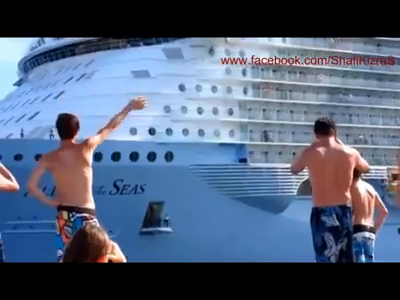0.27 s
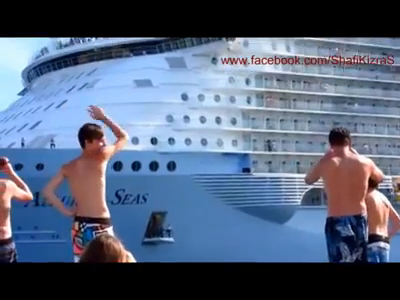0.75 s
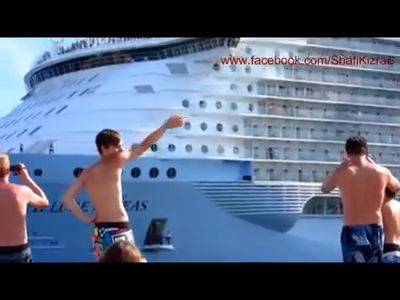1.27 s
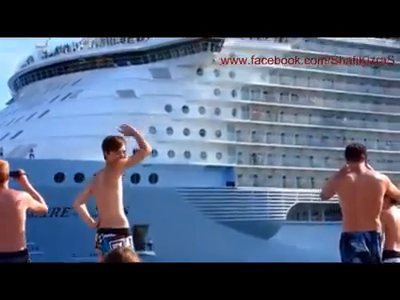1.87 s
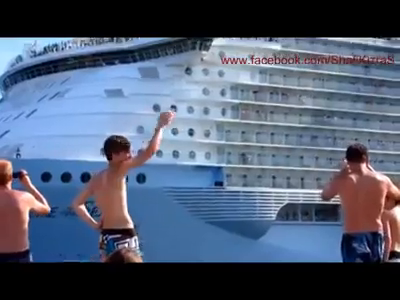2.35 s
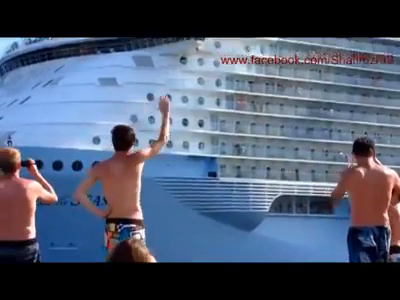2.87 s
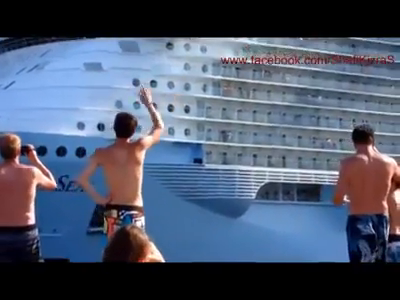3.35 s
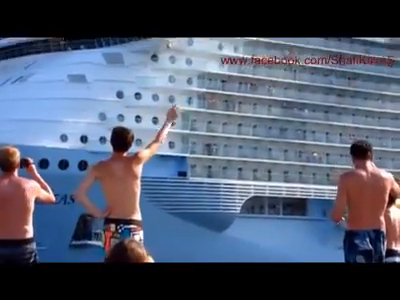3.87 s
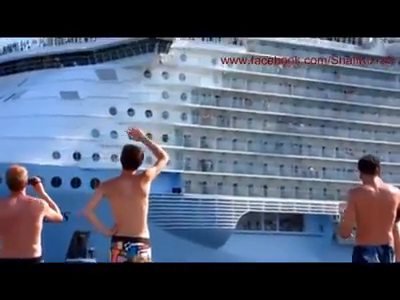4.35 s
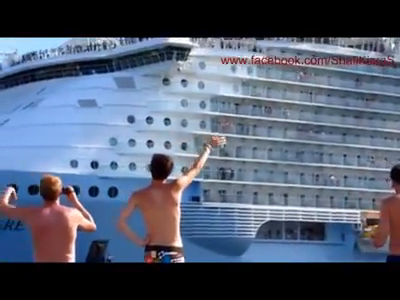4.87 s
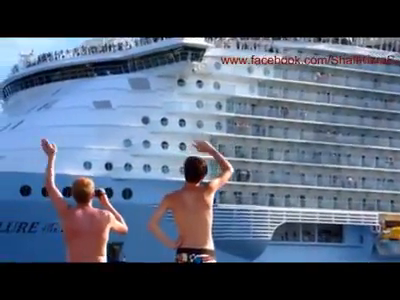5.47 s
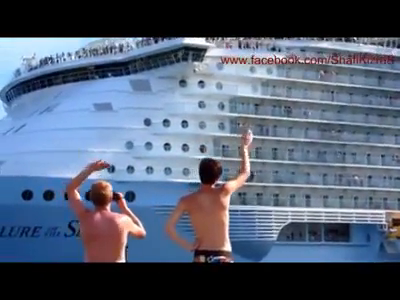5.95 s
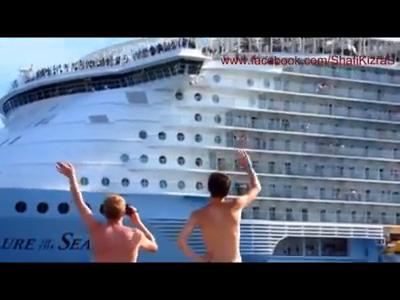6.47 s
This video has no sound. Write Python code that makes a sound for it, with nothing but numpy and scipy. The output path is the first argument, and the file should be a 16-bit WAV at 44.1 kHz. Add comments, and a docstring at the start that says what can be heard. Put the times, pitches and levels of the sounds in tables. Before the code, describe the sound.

Massive ship horn blast across the water, low, brassy and rasping with a rough beat, following a split second of beach surf and wind.

```python
"""Surf and wind wash over a beach, then cut off as a cruise ship's long blast arrives across the water.
Two air horns speak in a rush of air: sharp pressure pulses ring one bell, and a deeper horn beats against it.
Within the first second or so the tone stumbles three times, each time with a dry tick close by.
Moving air makes the partials swell, rasp and dull, over three faint wisps of filtered noise.
At the very end the air supply drops and the tone sinks quickly."""
import sys
import numpy as np
from scipy import signal
from scipy.io import wavfile
from scipy.ndimage import uniform_filter1d

SR = 44100
rng = np.random.default_rng(int(sys.argv[2]) if len(sys.argv) > 2 else 0)


def store_wav(level_fs):
    """Save 16-bit WAV to argv[1]."""
    pcm = np.round(np.clip(np.atleast_2d(level_fs), -1, 1) * 32767)
    wavfile.write(sys.argv[1], SR, pcm.T.astype(np.int16))


N = 296070
TIME = np.arange(N) / SR


def gain_of(db):
    """Decibels to amplitude."""
    return 10 ** (np.asarray(db) / 20)


def evened(x):
    """Scales to rms 1."""
    return x / np.sqrt(np.mean(x ** 2) + 1e-20)


def read(points, hz):
    """Reads a spectrum on a log-frequency axis."""
    f, value = np.transpose(points)
    return np.interp(np.log(hz + 1), np.log(f + 1), value)


def along(rows):
    """Reads a curve over time at every sample."""
    return np.interp(TIME, *np.transpose(rows))


def bump(centre_s, length_s):
    """Smooth swell that rises to 1 at its centre and dies away."""
    return np.exp(-(2 * (TIME - centre_s) / length_s) ** 2)


def coloured(x, points, size=8192):
    """Minimum-phase filter: each pulse starts sharply, then rings with the given spectrum."""
    log_gain = np.log(gain_of(read(points, abs(np.fft.fftfreq(size, 1 / SR)))))
    spectrum = np.exp(np.conj(signal.hilbert(log_gain)))
    ring = np.fft.ifft(spectrum).real[:size // 2]
    return signal.oaconvolve(x, ring)[:N]


def patches(shape, size):
    """Smooth random field of rms 1 over (.., frequency bins, frames)."""
    field = uniform_filter1d(rng.standard_normal(shape), size[0], axis=-2)
    return evened(uniform_filter1d(field, size[1], axis=-1))


def pulses(turns, count):
    """One sharp pulse a turn, as a sum of equal rotating partials."""
    step = np.exp(2j * np.pi * turns)
    train = np.zeros(N, complex)
    for _ in range(count):
        train = (train + 1) * step
    return train


def faded(x, swells, waver_db):
    """Slow changes of the air path: each frequency follows its share of every swell and wavers by chance."""
    hz, t, z = signal.stft(x, SR, nperseg=1024, noverlap=768)
    field = 0
    for curve, reach in swells:
        change = np.interp(t, TIME, curve - curve.mean())
        field = field + np.outer(read(reach, hz), change)
    field = field + waver_db * patches(field.shape, size=(3, 50))
    return evened(signal.istft(z * gain_of(field), nperseg=1024, noverlap=768)[1][..., :N])


def flutter(x, shared_db, apart_db, full_hz):
    """Small eddies vary level and phase, most in the treble, and differently at each ear."""
    hz, t, z = signal.stft(x, SR, nperseg=256, noverlap=192)
    ears = (2,) + z.shape
    field = shared_db * patches(z.shape, size=(30, 14)) + apart_db * patches(ears, size=(10, 16))
    twist = np.log(gain_of(apart_db)) * patches(ears, size=(10, 16))  # radians
    reach = np.minimum(hz / full_hz, 1)[:, None]
    z = z * gain_of(reach * field) * np.exp(1j * reach * twist)
    return signal.istft(z, nperseg=256, noverlap=192)[1][:, :N]


# how alike the diffuse noise is at the two ears: frequency_hz, likeness (0 to 1)
EAR_LIKENESS = [(30, 0.94), (45, 0.9), (70, 0.37), (130, 0.12), (260, 0.76), (550, 0.82), (1160, 0.45),
                (2430, 0.43), (5000, 0.16)]


def wash(spectrum, patchy_db):
    """Diffuse coloured noise, mottled by patchy_db, whose likeness at the ears depends on frequency."""
    hz = np.fft.rfftfreq(1024, 1 / SR)
    a, b, c, d = rng.standard_normal((4, len(hz), N // 256 + 5))
    same = np.clip(read(EAR_LIKENESS, hz), -1, 1)[:, None]
    left = a + 1j * b
    right = same * left + np.sqrt(1 - same ** 2) * (c + 1j * d)
    mottle_db = patchy_db * patches(a.shape, size=(14, 9))
    z = np.array([left, right]) * gain_of(read(spectrum, hz)[:, None] + mottle_db)
    return evened(signal.istft(z, nperseg=1024, noverlap=768)[1][:, :N])


# surf and wind before the blast: frequency_hz, level_db (per Hz, relative)
SURF_SPECTRUM = [(24, -34), (40, -4), (411, -6.5), (462, -6), (507, -5), (737, -5.5), (867, -5),
                 (1050, -10), (2200, -13.5), (10500, -36.5), (13600, -65), (22000, -120)]
SURF_DB = -28  # rms before the cut


def surf():
    """Surf and wind on the beach as steady diffuse noise, cut off just as the blast arrives."""
    heard = along([(0.1135, 1), (0.1155, 0)])
    return gain_of(SURF_DB) * heard * wash(SURF_SPECTRUM, patchy_db=0.0)


# rush of air during the blast: frequency_hz, level_db (per Hz, relative)
RUSH_SPECTRUM = [(20, -9.5), (60, -2), (130, 1.5), (280, 2), (520, -1.5), (780, -1), (1100, -5.5),
                 (1500, -7), (2500, -16), (4300, -21), (6300, -30), (8000, -47), (10500, -41)]
# the deepest rumble eases while that near 70 Hz grows: frequency_hz, drift_db_per_s
RUSH_DRIFT = [(30, -2), (70, 1), (150, -0.5), (3000, 0), (8000, -0.7)]
RUSH_DB = -30.5  # rms before its fade-in
RUSH_FOLLOWS_BLARE, RUSH_FOLLOWS_FLARES = 0.73, 0.14  # shares of the main horn's swells
PUFF_DB, PUFF_S, PUFF_ABOVE_HZ = 7, 0.003, 1500  # rise at each pulse, its decay time, where hiss begins


def rush():
    """An airy roar around the tone: its hiss puffs with each pulse and follows the horn's brass in part."""
    heard = along([(0.118, 0), (0.128, 1)])
    air = wash(RUSH_SPECTRUM, patchy_db=1.5)
    high_pass = signal.butter(2, PUFF_ABOVE_HZ, "high", fs=SR, output="sos")
    hiss = signal.sosfiltfilt(high_pass, air)
    since_pulse_s = uniform_filter1d(main_turns() % 1, size=30) / main_pitch()
    puffs = evened(gain_of(PUFF_DB * np.exp(-since_pulse_s / PUFF_S)))
    air = air + hiss * (puffs - 1)
    swells = [(TIME, RUSH_DRIFT),
              (RUSH_FOLLOWS_BLARE * along(BLARE), BLARE_REACH),
              (RUSH_FOLLOWS_FLARES * flares(), FLARE_REACH)]
    return gain_of(RUSH_DB) * heard * faded(air, swells, waver_db=0.7)


# faint wisps of hiss and squeak: centre_s, frequency_hz, width_hz, length_s, level_db (rms at the crest)
WISPS = [(0.9, 5950, 900, 0.044, -51), (2.636, 3900, 700, 0.079, -43.5), (5.475, 2660, 320, 0.09, -43)]


def wisps():
    """Band-passed noise in brief smooth swells, faint under the horn."""
    out = np.zeros(N)
    for centre_s, hz, width_hz, length_s, db in WISPS:
        edges_hz = [hz - width_hz / 2, hz + width_hz / 2]
        band_pass = signal.butter(2, edges_hz, "band", fs=SR, output="sos")
        band = signal.sosfilt(band_pass, rng.standard_normal(N))
        out += gain_of(db) * evened(band) * bump(centre_s, length_s)
    return out


# dry ticks: start_s, level_db (of the bare impulse)
TICKS = [(0.308, -2), (0.835, -18), (1.131, -3.5)]
# their spectrum, heaviest low down: frequency_hz, level_db
TICK_COLOUR = [(30, 2), (120, 18), (350, 8), (1000, 2.5), (3000, -1.5), (6000, -7.5), (10000, -16)]


def ticks():
    """Single impulses filtered into dry clicks with a low knock, close to where the tone stumbles."""
    clicks = np.zeros(N)
    for start_s, db in TICKS:
        clicks[round(start_s * SR)] = gain_of(db)
    return coloured(clicks, TICK_COLOUR)


# air supply to both horns: time_s, level_db
VALVE = [(0.112, -70), (0.119, -7), (0.132, 0), (6.666, 0), (6.678, -8), (6.69, -12), (6.71, -18)]


def air_supply():
    """The shared valve opens in an instant, holds, then drops at the end."""
    return gain_of(along(VALVE))


# the main horn rises very slightly: time_s, pitch_hz
PITCH = [(0.4, 92.2), (3.5, 92.27), (6.6, 92.33)]


def main_pitch():
    """Pulse rate of the main horn in Hz."""
    return along(PITCH)


# the pulses come late, or early below zero: start_s, delay_s, lasting_s
STUMBLES = [(0.309, -0.00145, 7), (0.830, 0.0017, 0.012), (1.134, 0.0015, 0.011)]
START_S = 0.1207


def main_turns():
    """Cycles of the main horn since the blast began: the running sum of pitch, shifted by each stumble."""
    delay_s = sum(late * ((TIME > s) & (TIME < s + lasting)) for s, late, lasting in STUMBLES)
    pitch = main_pitch()
    return np.cumsum(pitch) / SR - pitch[0] * (START_S + delay_s)


# gusts lift the treble to a short brassy rasp, lulls (below 0 dB) dull it: centre_s, length_s, lift_db
FLARES = [(0.301, 0.09, 2), (0.768, 0.11, 4.5), (1.081, 0.15, -11), (1.279, 0.18, 10.5), (1.855, 0.28, 7),
          (2.623, 0.32, 6), (3.109, 0.17, -6), (3.343, 0.2, 7.5), (3.838, 0.11, 7), (4.602, 0.17, 7.5),
          (4.944, 0.14, 3.5), (5.685, 0.2, 12), (6.027, 0.12, 9.5)]


def flares():
    """Lift of the treble in dB: each gust or lull comes and goes smoothly."""
    return sum(db * bump(centre_s, length_s) for centre_s, length_s, db in FLARES)


# partials of the deep horn: multiple, level_db
DEEP_PARTIALS = [(1, -14.5), (2, 0.5), (3, 5), (4, -3), (5, -6), (6, -16), (7, -23), (8, -11), (9, -24),
                 (10, -16.5), (12, -29), (20, -30.5), (40, -57), (90, -89)]
# its colour drifts as the ship glides past: frequency_hz, drift_db_per_s
DEEP_DRIFT = [(71, 0), (142, 0.4), (213, -1.4), (400, 0.64)]
DEEP_RATIO = 71.15 / 92.27  # pitch relative to the main horn
DEEP_DB = -26  # rms
WAVER_DB = 1.9  # chance wavering of either horn, rms


def deep_horn(turns):
    """A duller, lower horn: pulses on the same air supply ring its bell."""
    drive = pulses(turns, count=60).real * air_supply()
    pitch = DEEP_RATIO * main_pitch().mean()
    bell = [(25, -55)] + [(k * pitch, db) for k, db in DEEP_PARTIALS]
    return gain_of(DEEP_DB) * faded(-coloured(drive, bell), [(TIME, DEEP_DRIFT)], WAVER_DB)


# partials of the main horn: multiple, level_db
MAIN_PARTIALS = [(1, -10.5), (2, 1.5), (3, 3.5), (4, 0.5), (5, -8), (6, -10), (7, -5.5), (8, 0), (9, -2.5),
                 (10, -8), (11, -15), (12, -17), (13, -10.5), (14, -8.5), (15, -11), (16, -13.5),
                 (17, -16.5), (18, -24), (19, -23), (20, -20), (21, -21.5), (22, -25), (23, -21), (24, -28),
                 (25, -25.5), (26, -29.5), (27, -33.5), (28, -41.5)]
# its brassy top, on the scale of the partials: frequency_hz, level_db
BRASS = [(2700, -33.5), (3000, -31), (3230, -40.5), (3450, -32), (3800, -44), (4080, -33.5), (4430, -46.5),
         (4750, -42), (5000, -54), (6000, -57), (7200, -70.5), (9000, -91)]
# its colour drifts as the ship glides past: frequency_hz, drift_db_per_s
MAIN_DRIFT = [(92, 0), (185, -0.5), (277, -0.18), (369, 0.8), (470, 0.14), (640, -0.4), (738, 0),
              (900, -1.2), (1300, -0.26), (4600, -0.3)]
# swells of the low partials, only the changes counting: time_s, level_db
BODY = [(0.2, -22), (0.4, -18), (1.81, -21), (1.84, -24.5), (2.51, -19), (2.93, -23), (3.33, -20),
        (3.51, -22), (4.08, -20.5), (4.65, -22), (4.67, -23), (4.87, -20), (5.31, -24), (5.53, -20.5),
        (5.69, -23.5), (6.08, -25.5), (6.58, -18), (6.62, -18.5)]
# how far each range follows the body: frequency_hz, share
BODY_REACH = [(92, 0.11), (185, 0.52), (277, 0.75), (369, 0.43), (600, 0.035), (1300, 0.033)]
# swells of the strong partials near 740 Hz, only the changes counting: time_s, level_db
RING = [(0.2, -28.5), (1.18, -28), (2.2, -28.5), (3.74, -24), (4.2, -25.5), (5.15, -22.5), (6.33, -26.5),
        (6.44, -21.5), (6.62, -22.5)]
# how far each range follows the ring: frequency_hz, share
RING_REACH = [(470, 0), (640, 0.4), (738, 0.91), (830, 0.35), (1000, 0.069)]
# swells of the blaring middle through moving air, only the changes counting: time_s, level_db
BLARE = [(0.16, -30), (0.34, -28), (0.45, -32), (1.3, -28.5), (1.55, -31.5), (2.07, -29), (2.23, -32),
         (2.78, -28), (3.23, -35.5), (3.43, -25), (3.52, -28), (4.24, -29.5), (4.35, -34), (4.94, -28),
         (5.47, -37), (5.61, -28), (6.48, -32), (6.64, -28.5)]
# how far each range follows the blare: frequency_hz, share
BLARE_REACH = [(400, 0), (738, 0), (900, 0.12), (1300, 1.3), (2400, 0.4), (4600, 0.18)]
# the highest partials follow the flares most: frequency_hz, share
FLARE_REACH = [(1300, 0.043), (2400, 0.78), (4600, 1.37), (8000, 1.8)]
MAIN_DB = -17.5  # rms


def main_horn(turns, beat, sideband=0.3, sideband_hz=2200, throb=0.023):
    """Steep pulses ring the flared bell, roughened by the beat with the deep horn."""
    train = pulses(turns, count=90)
    highs = signal.lfilter(*signal.butter(1, sideband_hz, "high", fs=SR), train)
    middle = signal.lfilter(*signal.butter(1, [600, 900], "band", fs=SR), train)
    wheel = np.exp(2j * np.pi * beat)
    # a sum tone just above each high partial
    sum_tones = sideband * highs * wheel
    # the middle partials throb at the beat rate and twice it
    throbbing = throb * middle * (wheel + wheel ** 2).real
    drive = (train + sum_tones + throbbing).real * air_supply()
    pitch = main_pitch().mean()
    bell = [(30, -42.0)] + [(k * pitch, db) for k, db in MAIN_PARTIALS] + BRASS
    swells = [(TIME, MAIN_DRIFT), (along(BODY), BODY_REACH), (along(RING), RING_REACH),
              (along(BLARE), BLARE_REACH), (flares(), FLARE_REACH)]
    return gain_of(MAIN_DB) * faded(-coloured(drive, bell), swells, WAVER_DB)


DEEP_LATE_S = 0.00285  # lag of the deep horn's pulses
BEAT_LEAD_S = 0.0066  # the rasp leads the beat between the horns


def horns():
    """Both horns share one air supply and keep their interval; eddies flutter the sum."""
    turns, pitch = main_turns(), main_pitch().mean()
    deep_turns = DEEP_RATIO * (turns - pitch * DEEP_LATE_S)
    # the deep horn's third partial beats with the main horn's second; the rasp peaks just before each crest
    beat_hz = (3 * DEEP_RATIO - 2) * pitch
    beat = 3 * deep_turns - 2 * turns + beat_hz * BEAT_LEAD_S
    both = main_horn(turns, beat) + deep_horn(deep_turns)
    return flutter(both, shared_db=1.6, apart_db=2.2, full_hz=3500)


def scene():
    """The ship lies almost straight ahead, its horns a touch louder on the left."""
    balance = gain_of([[0.3], [-0.3]])
    return surf() + rush() + wisps() + ticks() + horns() * balance


def record(dry, threshold_db=-20, squeeze=0.061):
    """Fast gain control eases loud moments by squeeze dB per dB over threshold; then the treble is cut."""
    power = uniform_filter1d((dry ** 2).mean(0), size=478)
    power_db = 10 * np.log10(abs(power) + 1e-12)
    over_db = uniform_filter1d(np.maximum(power_db - threshold_db, 0), size=100)
    low_pass = signal.firwin(511, 10500, window=("kaiser", 9), fs=SR)  # cutoff in Hz
    return signal.oaconvolve(dry * gain_of(-squeeze * over_db), low_pass[None], "same")


dry = scene()
out = record(dry)
store_wav(out)
```